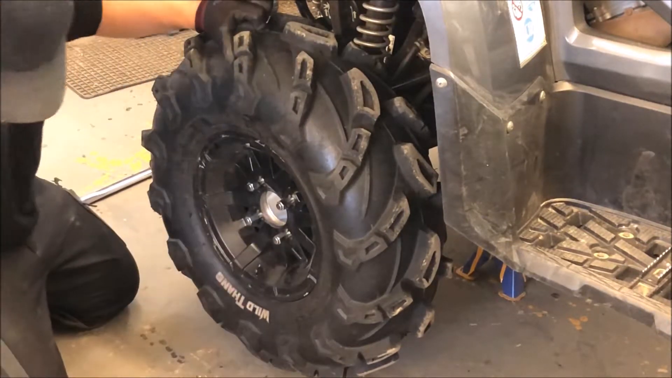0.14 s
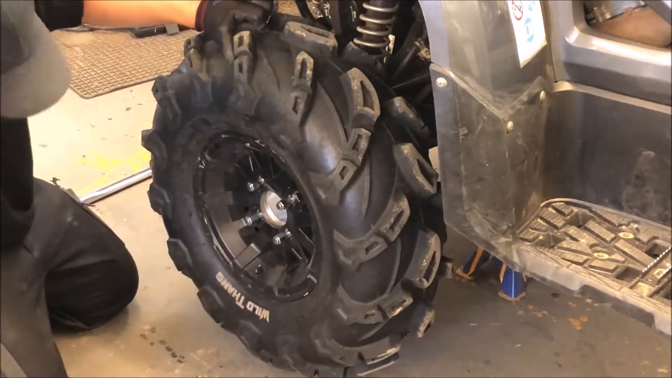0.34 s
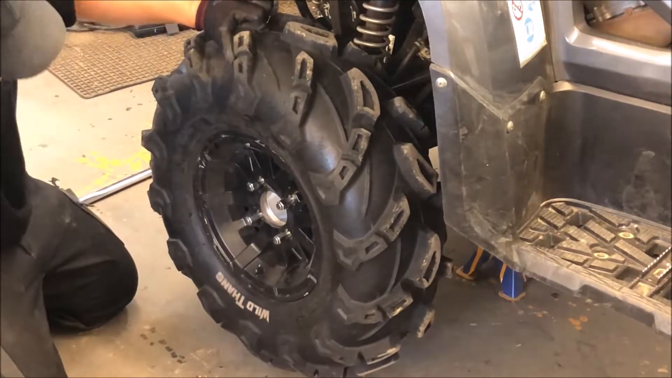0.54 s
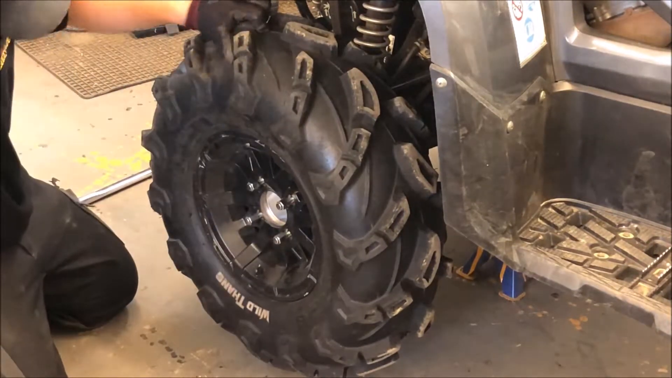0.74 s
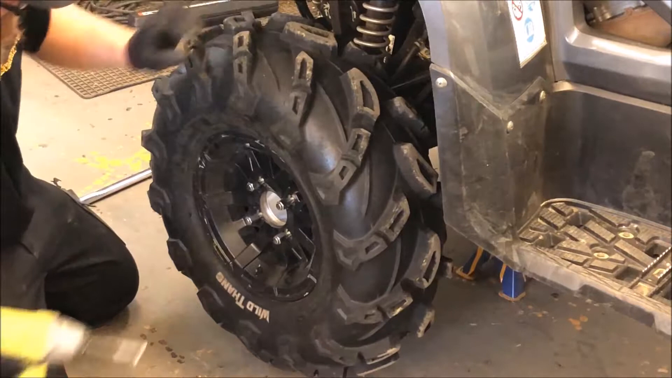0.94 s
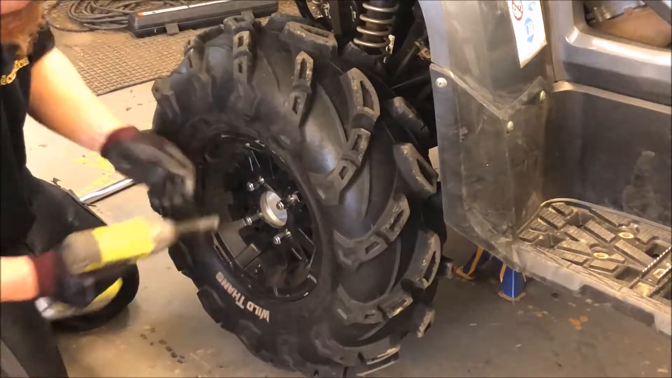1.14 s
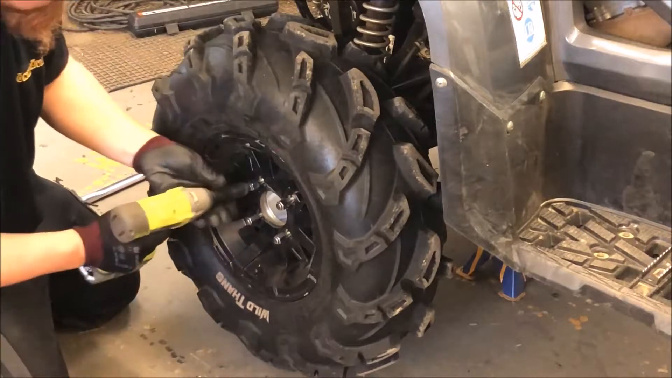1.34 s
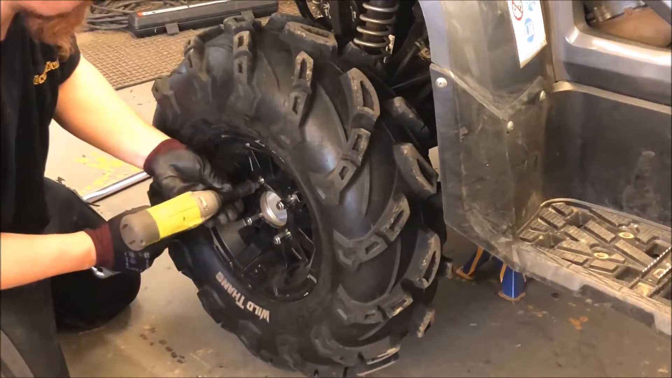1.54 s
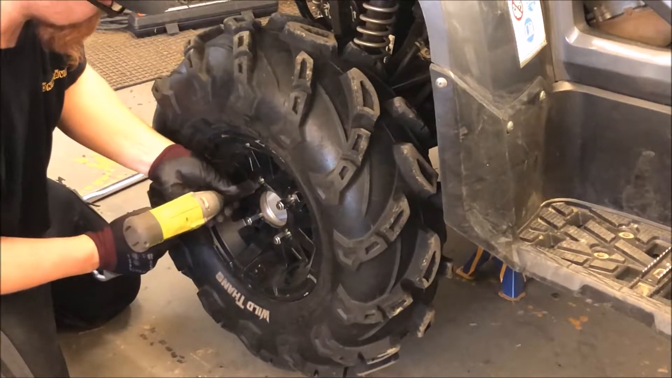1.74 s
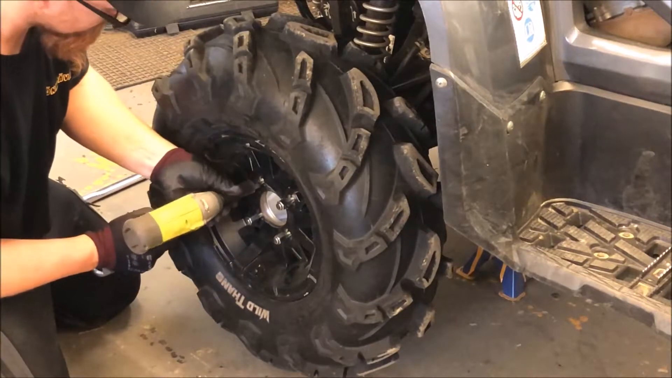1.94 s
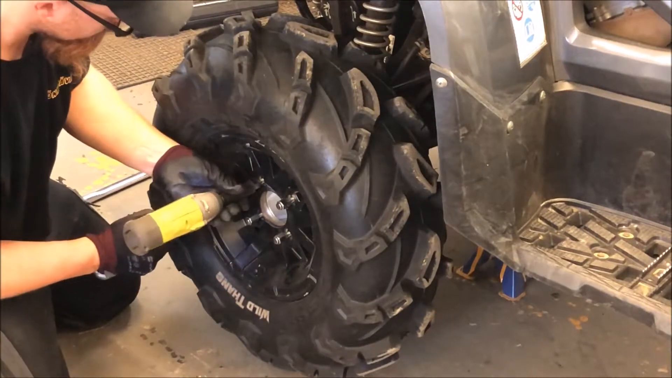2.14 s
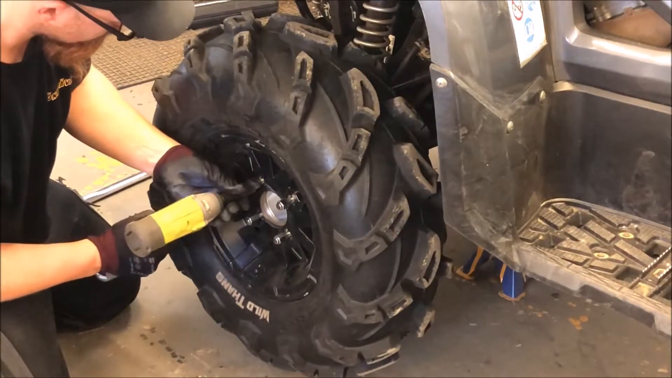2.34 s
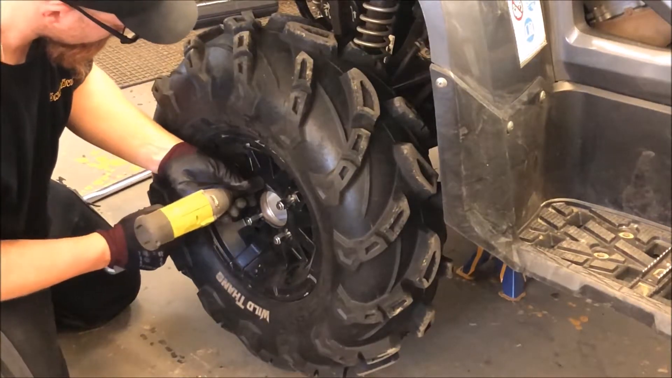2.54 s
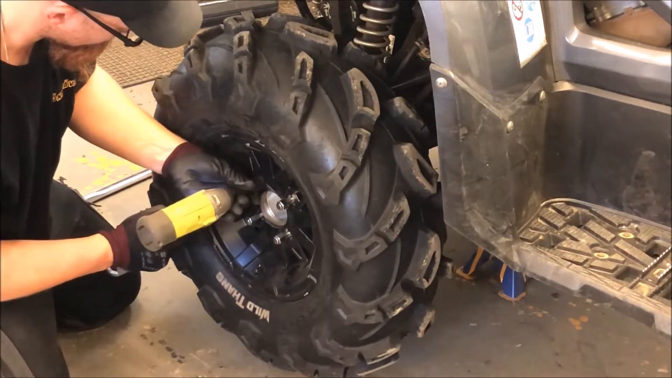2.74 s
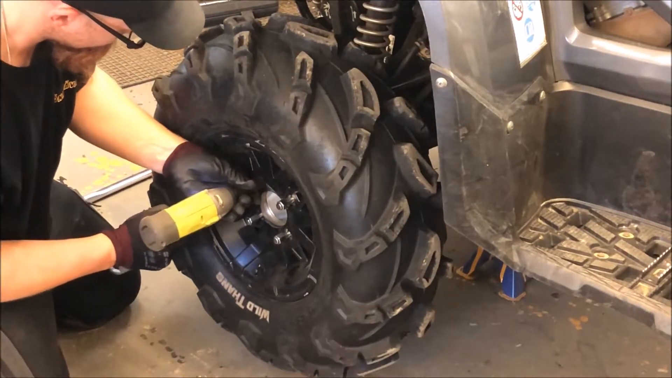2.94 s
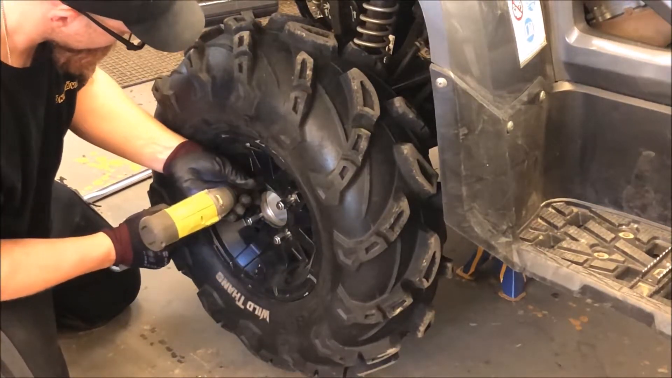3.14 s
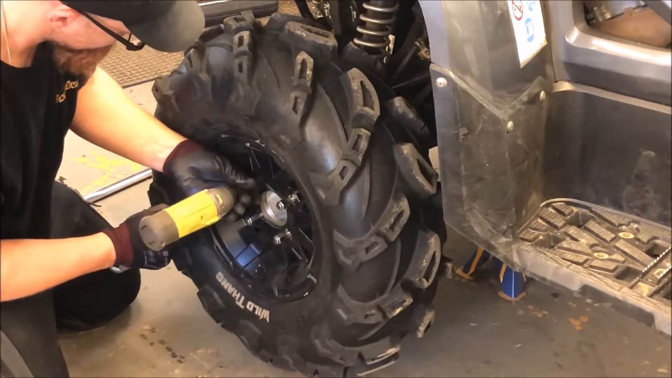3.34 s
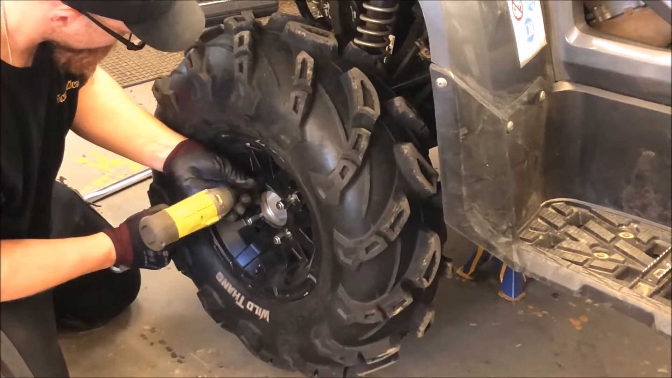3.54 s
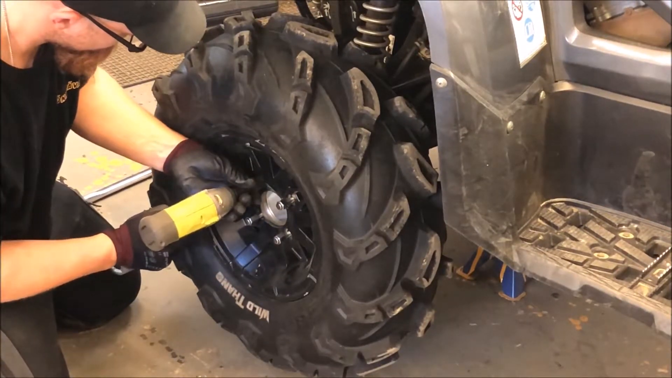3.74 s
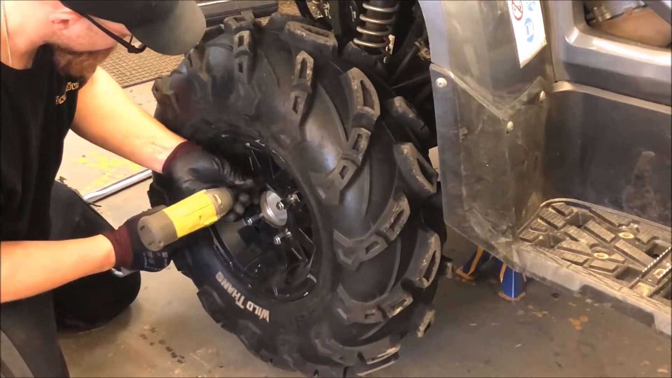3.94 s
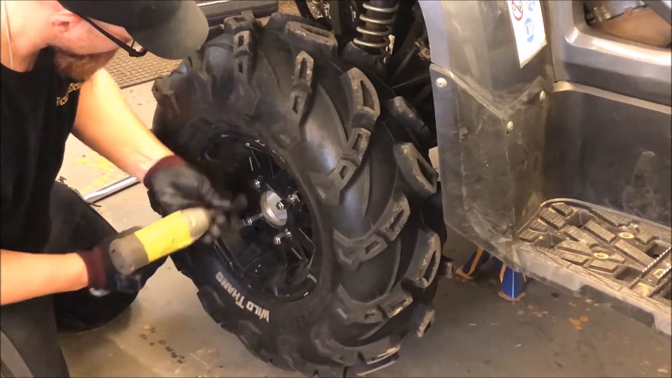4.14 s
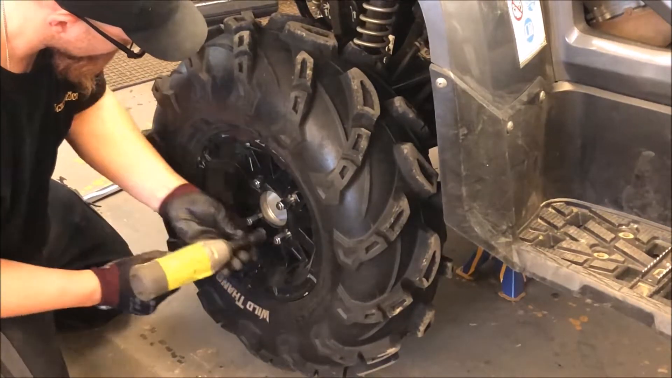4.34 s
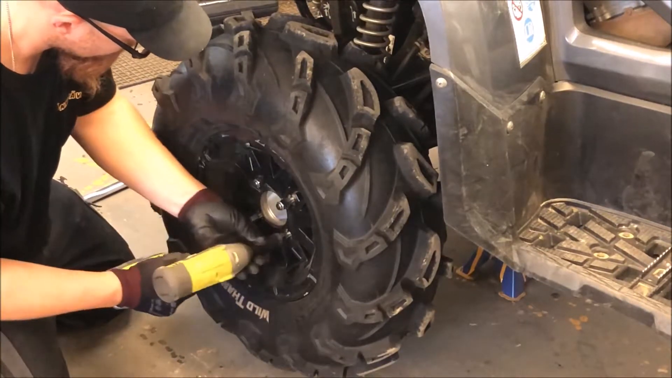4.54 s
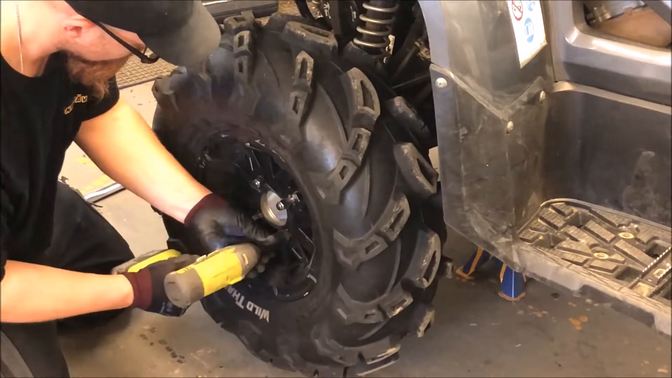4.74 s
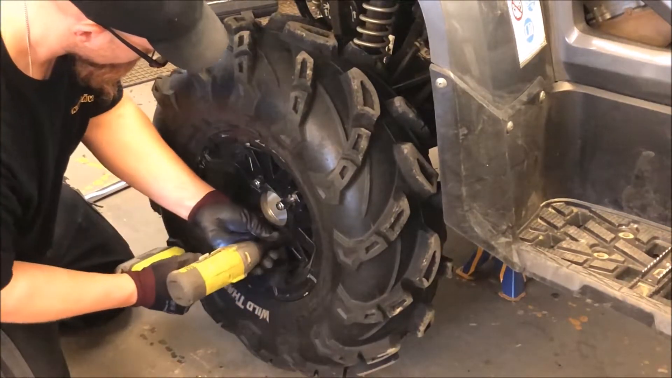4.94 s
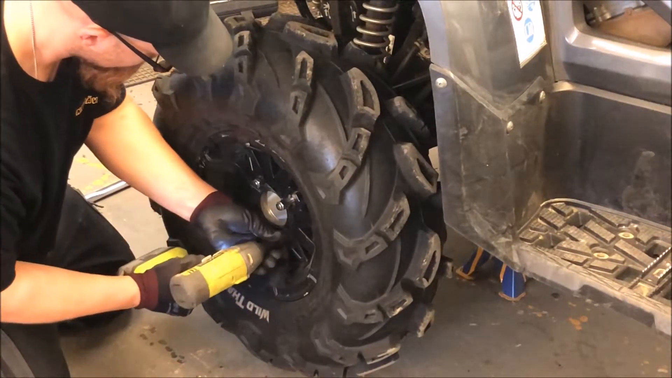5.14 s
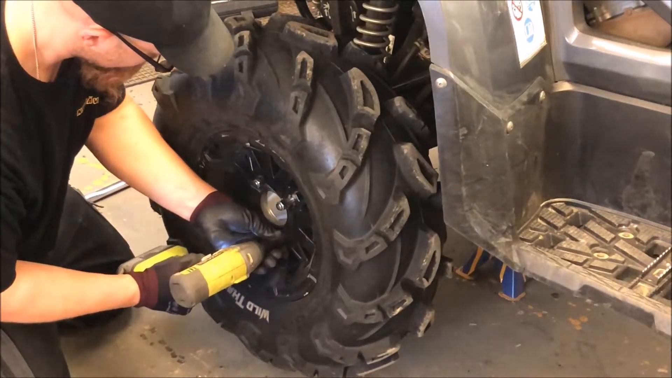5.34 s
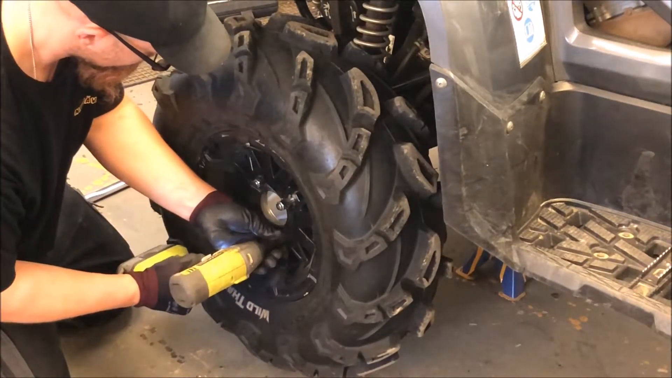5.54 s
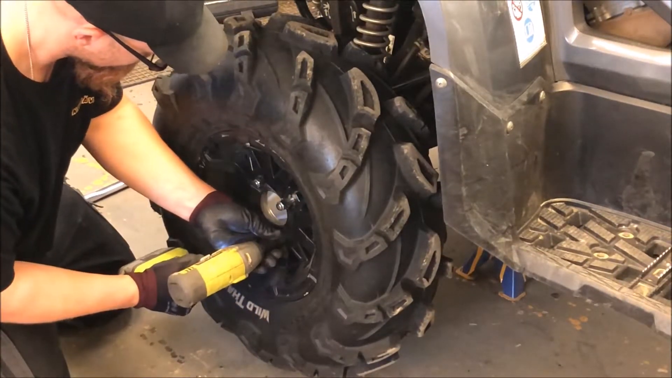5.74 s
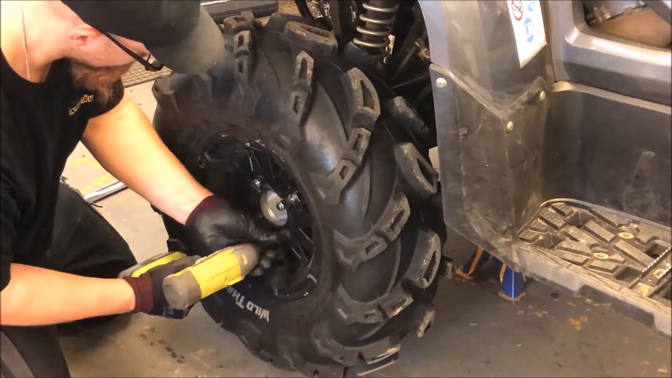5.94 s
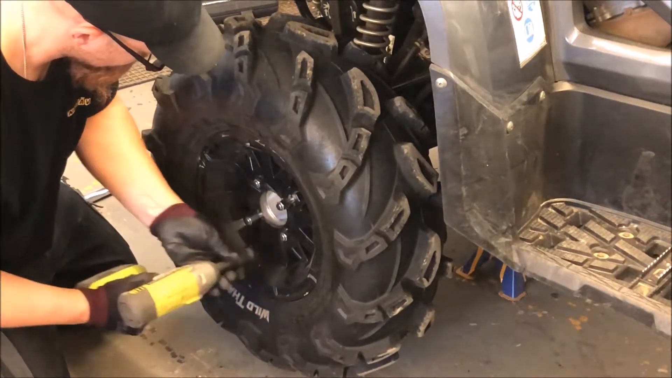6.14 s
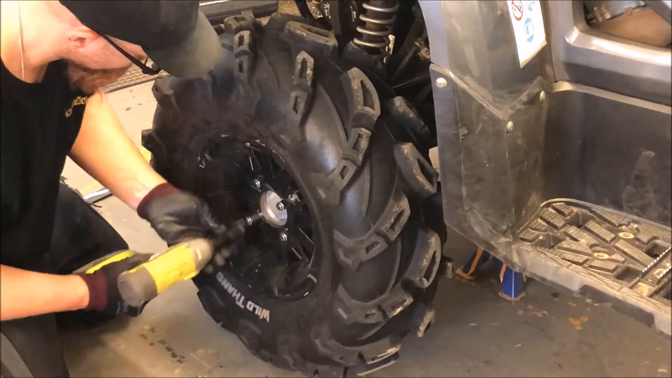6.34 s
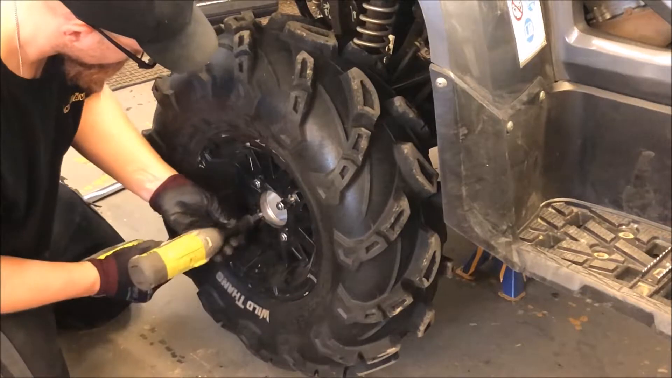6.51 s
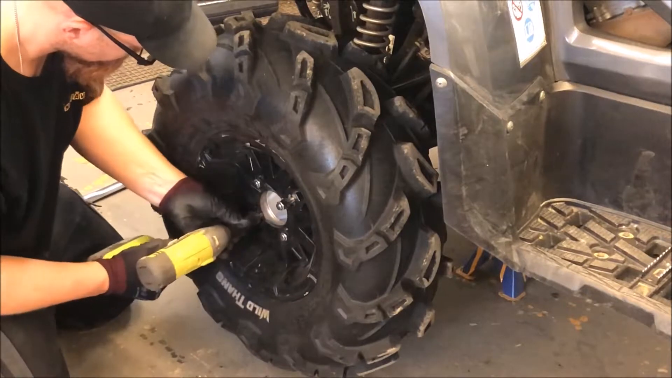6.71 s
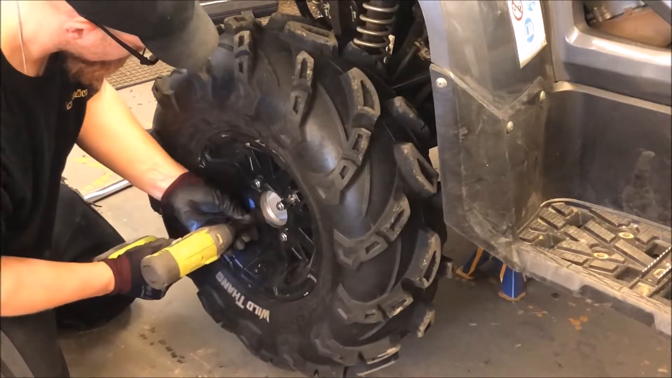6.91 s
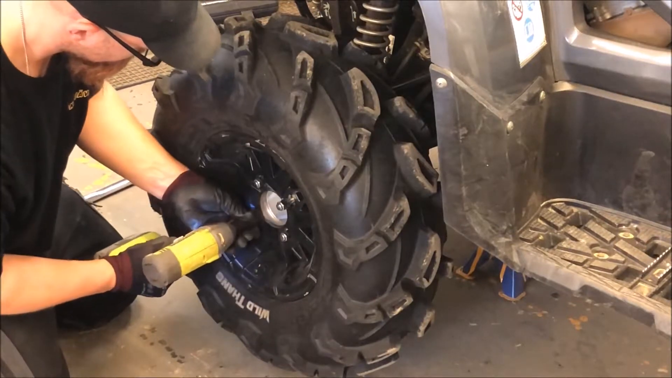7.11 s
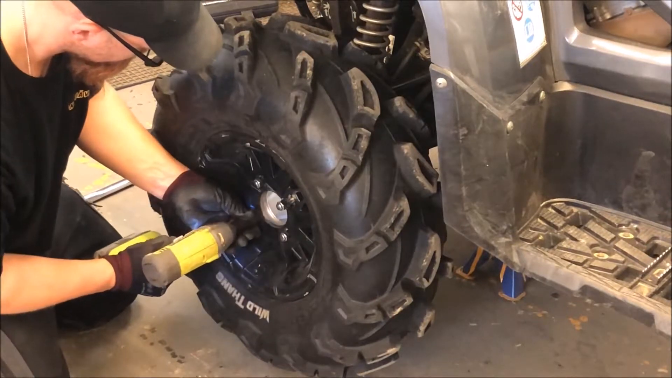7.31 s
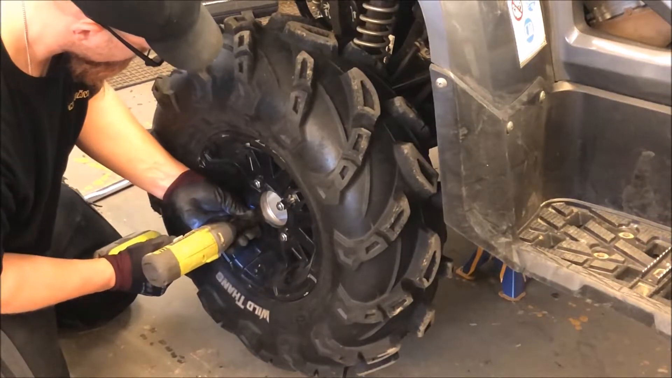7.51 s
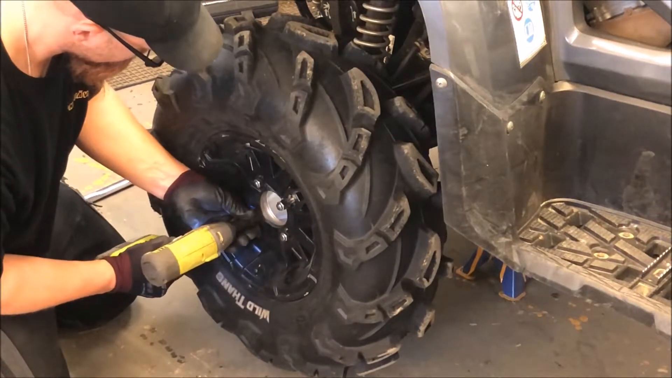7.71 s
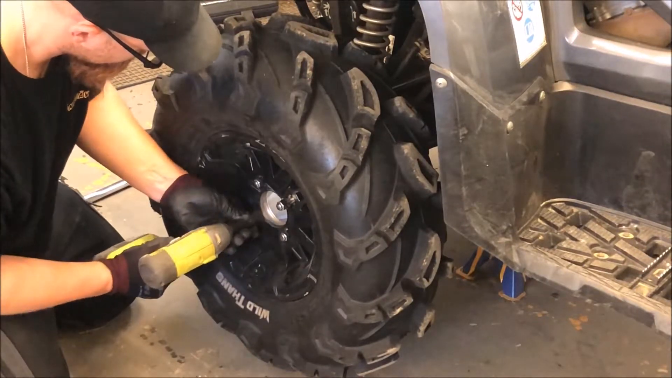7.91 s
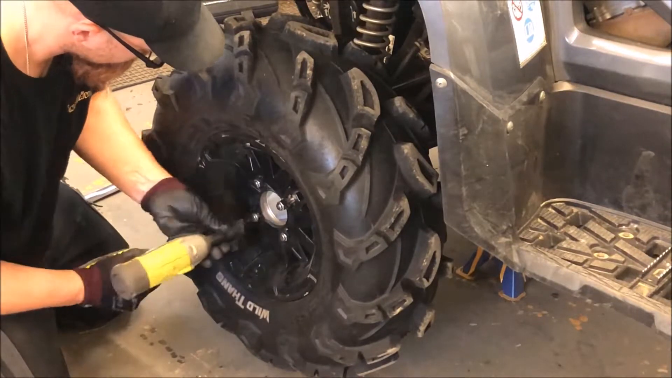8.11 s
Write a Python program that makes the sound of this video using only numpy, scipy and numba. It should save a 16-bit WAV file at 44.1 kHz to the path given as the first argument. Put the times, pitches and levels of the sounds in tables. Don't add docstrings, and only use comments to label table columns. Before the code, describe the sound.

Close phone pickup in a hard, bare garage. Gloves rub softly and loose metal ticks before a thin electric whine and growling motor rattle a socket on a nut. Fast, harsh hammer blows follow for a fraction of a second, then stop into a ringing echo. After brief shuffles and clacks, the motor runs and hammers again, then a third time. The loud blows pump and clip the sound.

```python
import sys
import numpy as np
from scipy import signal
from scipy.fft import rfft, irfft
from scipy.io import wavfile
from scipy.ndimage import uniform_filter1d
from numba import njit

SR = 44100
rng = np.random.default_rng(int(sys.argv[2]) if len(sys.argv) > 2 else 0)


def wav_out(sig):
    wavfile.write(sys.argv[1], SR, np.round(np.clip(np.atleast_2d(sig).T, -1, 1) * 32767).astype(np.int16))


def ratio_of_db(decibels):
    return 10 ** (np.asarray(decibels, float) / 20)


N = 360297
SPLIT_HZ = 5500

# (time [s], level [dB], treble [dB], bass [dB])
RUSTLE = [
    [(0.0, -55, -2, -10), (0.2, -81, -24, -6.5), (0.42, -78, 15, -10), (0.55, -66.5, -1, 8.5),
     (0.85, -70.5, 5, -1), (1.45, -79, 0, -1), (1.47, -79, 30, 30.5), (1.7, -61.5, -25, 0),
     (1.73, -64, 3, 11.5), (1.92, -80, -5, 8.5), (2.2, -72, 6, -10), (2.34, -65.5, 11, 16.5),
     (2.52, -58, -5, 1), (2.62, -54, -16, -15)],
    [(4.5, -71.5, -39, -25), (4.506, -44.5, 0.5, 4.5), (4.86, -47.5, -12, -9)],
    [(6.46, -72, -12, -6), (6.482, -46, 3, 8.5), (6.808, -56.5, -30, -5), (6.89, -50, 22, 10)],
]
# (frequency [Hz], level [dB])
RUSTLE_COLOUR = [(24, -44), (40, -19), (243, -4), (337, -5), (1120, -9.5), (1520, -15.5), (5580, -23.5),
                 (7360, -24), (16000, -47)]
# (time [s], peak [dB], bass [dB], treble [dB], sent to hall [dB], ring [Hz])
KNOCKS = [(0.3485, -54, -8, 0, 10, 1280), (0.3704, -47.5, -31, -2, 10.5, 4700),
          (0.5124, -51, -10, -16, 9, 1930), (0.554, -53.5, -7, 0, 11, 2620),
          (0.615, -37.5, -27, -7, 5, 1490), (1.0992, -42, -8.5, -4.5, 6, 2880),
          (1.4682, -37.5, -25, -16, 9.5, 3610), (1.721, -41, -25, 2, 2.5, 3460),
          (1.9644, -69, 0, -7, 2, 1250), (2.0394, -66, -1, -5, 4, 3540), (2.0778, -52, -12.5, -11, 6, 3150),
          (2.2858, -40, -19, -9, 6, 1390), (2.299, -38.5, -4.5, -4, 12, 4230),
          (2.3209, -22.5, -21, 4, 5, 3020), (2.613, -43, -16, -23, 11, 1230),
          (2.7758, -37.5, 0, 2, 8, 1340), (2.8644, -24, -15, -7, 3, 3200), (2.9577, -33.5, -8, -1, 9, 2930),
          (3.091, -37.5, -20, 5, 7, 3270), (3.1793, -37.5, -5.5, 6, -1, 3430),
          (3.2086, -41, -2, -16, 2, 2860), (3.379, -38, -2, 5, 5, 1760), (3.5544, -34, -17, 5, 4.5, 1720),
          (3.6104, -23.5, 0, -11, 7, 1930), (4.5128, -30, -25, -16, 3, 1450),
          (4.557, -29.5, -7, -2.5, 1, 1790), (4.6155, -32.5, -21, -30, 5, 1360),
          (4.6713, -37, -11, -27, -2, 1350), (4.7294, -58, -22, -15, 4, 1720),
          (4.7694, -51.5, -14, -19, 2, 1320), (4.8467, -18, -25, 3, 3.5, 2860),
          (4.8734, -29, -11, -8, 6, 2200), (4.9274, -25.5, -24, -12, 6, 1650),
          (4.983, -25.5, -13, 4, 7, 2200), (5.0025, -14, -24, -9, 2, 4440), (5.039, -29, -15, -31, 4, 1900),
          (5.1604, -28, -22, -8, 0, 4380), (5.1693, -18.5, -15, 4.5, 2.5, 2940),
          (5.233, -27.5, -22, 4, 5, 2480), (5.2842, -23, -18, -15, 3, 4470),
          (5.2904, -22, -22, -7, 6, 4400), (5.3126, -14.5, -18, -3, 2.5, 3040),
          (5.3442, -20, -25, 2.5, 8.5, 2280), (5.3775, -14.5, -21, -24, 5.5, 3000),
          (5.458, -22, -20, 1, 2, 3040), (5.4822, -15.5, -37, -2.5, 5.5, 2820),
          (5.583, -20, -8, 11.5, 5.5, 4540), (6.4713, -31, -11, 3.5, 6, 2550),
          (6.5057, -37.5, 4.5, -17, 5, 2710), (6.5804, -49, 1, -3, 10, 1240),
          (6.693, -37.5, -31, -15, 3.5, 2720), (6.7078, -43, -22, -17, 0, 1750),
          (6.8278, -40, -19, -12, 13, 2940), (6.8753, -18, -26, -0.5, 2.5, 2870),
          (6.8882, -31, -22, -10, 4, 2800), (6.931, -24, -24, -2, -1, 2890), (6.9541, -19, -28, 1, 2, 3140),
          (7.2178, -33, -12.5, 1.5, 4, 3600), (7.2597, -38, -6, 13, 8, 2380),
          (7.321, -35.5, -13.5, 12, 9, 4470), (7.41, -33, -14, 4, 10, 4600),
          (7.481, -36.5, -16, 8, 9, 2440), (7.5484, -31, -15, 4, 7, 1730)]
# (frequency [Hz], width [Hz], level [dB])
SOCKET_TONES = [(3535, 150, 0), (3830, 130, -1), (5800, 33, -16), (6360, 30, -19), (8600, 28, -13),
                (4500, 60, -11)]
# (time [s], ring [dB])
SOCKET_TAPS = [(.36, -79), (1.098, -66), (1.468, -47), (1.722, -61), (4.513, -64), (6.472, -41)]
# (frequency [Hz], level [dB])
WHINE = [(7472, -83), (14917, -91)]
# (start [s], end [s])
WHINE_SPAN = (1.8, 3.7)
# (time [s], gears [dB], treble [dB], hum [dB], hum [Hz])
MOTOR = [
    [(2.6, -55.5, -2.5, -67, 200), (2.78, -44, -1, -52, 231), (3.01, -47, -3.5, -46, 180),
     (3.522, -43, -3.5, -44.5, 244), (3.624, -45, 4, -45, 205), (3.63, -39, -7, -47, 210)],
    [(4.85, -38, -6, -57, 215), (4.878, -39.5, -5, -51, 223), (5.054, -41, -1, -46, 194),
     (5.308, -37, -5, -56, 230), (5.61, -39.5, -1, -40, 179)],
    [(6.88, -36.5, -11, -60, 206), (7.03, -40.5, -3.5, -50, 211), (7.542, -47.5, 1.5, -62, 211),
     (7.57, -28, -19, -58, 241)],
]
# (frequency [Hz], width [Hz], level [dB])
HOUSING_TONES = [(1360, 200, -6), (1780, 130, -5), (3270, 200, 0), (4700, 150, -7), (5420, 200, -7),
                 (7080, 250, -6), (8250, 200, -8), (10650, 350, -5), (14650, 400, -1)]
# (frequency [Hz], level [dB])
GEAR_COLOUR = [(18, -53.5), (30, -30), (127, -7), (170, 0.5), (554, -10), (740, -6), (1070, -12.5),
               (3220, -8), (6050, -14), (10500, -20), (12300, -26.5), (14800, -18.5), (16000, -35.5)]
# (time [s], ring [dB])
HOUSING_RING = [(2.9, -20), (3.05, -7), (3.63, -6), (4.85, -18), (6.9, -18), (7.5, -13)]
# (time [s], peak [dB], treble [dB], dip of the phone's volume [dB])
BLOWS = [(3.6332, -15.5, 3, -2), (3.6391, -6, -21.5, -2.5), (3.6593, -8, -3.5, -9), (3.69, -8, -15.5, -5),
         (3.7078, -8.5, -23, 3), (3.7401, -7, -4, -4.5), (3.747, -10, -9, -1), (3.7669, -14, 2, -1.5),
         (3.7782, -11.5, -18, -0.5), (3.7867, -12, -14, -0.5), (3.8053, -8.5, -15, 4),
         (3.8145, -18, -13.5, 1), (3.842, -5, -25.5, -1.5), (3.8541, -7, -3, -9), (3.8617, -5, -15, -3),
         (3.8806, -13.5, -26, 1), (3.8904, -8, 1, -0.5), (3.9006, -16.5, 1, -4.5), (3.918, -13.5, -2, 4),
         (3.931, -14, -20, -0.5), (3.9625, -10.5, 0, -1), (5.6104, -7.5, -23.5, 0.5),
         (5.619, -11.5, -27, 1), (5.6282, -6.5, -12, -9), (5.653, -10.5, -15, -1), (5.6621, -5, -9.5, -8.5),
         (5.6939, -13, -18, -5.5), (5.7149, -5.5, -14, -4.5), (5.7227, -7.5, -1, -8), (5.7534, -9, -3, -10),
         (5.7768, -20, -7, 4.5), (5.7825, -28, 1, -8), (5.8043, -8, -21, -1.5), (5.8131, -12, 2, -11),
         (5.8322, -7, -16, -4.5), (5.8647, -9, -17.5, -7.5), (5.8941, -7, -19, -4), (5.917, -18, 8.5, -1),
         (7.5685, -13.5, -11, 3.5), (7.5709, -14.5, 5.5, -2), (7.579, -16, -1, -4.5),
         (7.6067, -11.5, -28, -3), (7.612, -3.5, -19, -6.5), (7.6458, -10, -4, -5), (7.6758, -8.5, -2, -8),
         (7.7009, -6.5, -13, -1), (7.7054, -21, 5, -8.5), (7.735, -4, -6, -10), (7.7634, -6.5, 1, -9.5),
         (7.7918, -7.5, -19, -4.5), (7.8199, -7.5, -12, -4), (7.8695, -7, -7, -2.5), (7.8775, -18, 2.5, -3),
         (7.903, -10.5, -10, 0.5), (7.9242, -16, -19, 0)]
# (time [s], level [dB], treble [dB])
POUNDING = [
    [(3.64, -19, -4), (3.918, -36.5, 5.5), (3.98, -22.5, -6)],
    [(5.62, -20.5, -2), (5.842, -18.5, -3.5), (5.94, -29, 2)],
    [(7.575, -19.5, 1), (7.933, -21, -6), (7.94, -21, -8)],
]
# (frequency [Hz], width [Hz], level [dB])
STEEL_TONES = [(700, 69, -4), (1640, 630, 0), (2996, 83, 0), (4470, 300, -2), (6840, 290, -4),
               (11500, 84, -8), (11400, 77, -12)]
# (frequency [Hz], level [dB])
POUND_COLOUR = [(24, -56), (40, -77), (199, -4), (243, -8), (733, -4), (1070, -5.5), (1630, -2.5),
                (2440, -2.5), (3470, -2), (5310, -3.5), (7170, 1), (14800, -6), (16000, -13)]
ANVIL_HZ = [1250, 1640, 1900, 2276, 3140, 3533]
# (frequency [Hz], time to fall by 60 dB [s])
HALL = [(100, 0.92), (300, 0.99), (1000, 0.9), (2500, 0.71), (4500, 0.89), (7000, 0.5), (10000, 0.52),
        (14000, 0.24)]
# (frequency [Hz], level [dB])
ROOM_COLOUR = [(15, -41.5), (25, -18), (256, -9), (1020, -31), (1190, -25), (1440, -28), (1610, -19),
               (6740, -29), (14800, -40), (16000, -42)]
# (centre [s], length [frames], tones kept [count], preference for
THINNED = [(.95, 1, 6, .4), (1.165, 1, 9, .2), (1.27, 1, 7, .2), (1.355, 1, 7, .4), (1.70, 1, 7, .3),
           (2.358, 1, 9, .2), (3.045, 1, 24, .3), (3.47, 1, 20, .3), (3.62, 1.4, 10, .6), (3.723, 1, 6, .1),
           (4.312, 1.6, 8, .2), (4.387, 1, 12, .2), (5.602, 1.4, 4, .5), (6.625, 1, 20, .3),
           (7.841, 1, 3, 0), (7.949, 1, 2, 0)]


def unit(x):
    return x / np.sqrt(np.mean(x ** 2))


def band(x, lo_hz, hi_hz):
    return signal.sosfilt(signal.butter(2, [lo_hz, min(hi_hz, .45 * SR)], "band", fs=SR, output="sos"), x)


def split(x, at_hz):
    hz = np.fft.rfftfreq(len(x), 1 / SR)
    low = irfft(rfft(x) / (1 + (hz / at_hz) ** 4), len(x))
    return unit(low), unit(x - low)


def tilt(x, db, treble_db):
    low, high = split(x, SPLIT_HZ)
    return ratio_of_db(db) * (low + ratio_of_db(treble_db) * high)


def colour(x, points, peaks=(), peak_db=0.):
    hz = np.maximum(np.fft.rfftfreq(len(x), 1 / SR), 1)
    curve_hz, curve_db = np.transpose(points)
    gain = ratio_of_db(np.interp(np.log(hz), np.log(curve_hz), curve_db))
    lift = sum(1 / (1 + (2 * (hz - f) / w) ** 2) for f, w, _ in peaks)
    return unit(irfft(rfft(x) * gain * (1 + (ratio_of_db(peak_db) - 1) * lift), len(x)))


def play(tables, fade=.006):
    t, rows = np.arange(N) / SR, np.vstack(tables)
    gate = sum((t >= table[0][0]) & (t < table[-1][0]) for table in tables)
    curves = [np.interp(t, rows[:, 0], column) for column in rows.T[1:]]
    return uniform_filter1d(1. * gate, int(fade * SR) + 1), curves


def held(times, values):
    index = np.searchsorted(times, np.arange(N) / SR, "right") - 1
    return 1. * np.asarray(values)[np.maximum(index, 0)]


def grains(rate, scatter_db):
    ticks = rng.random(N) < rate / SR
    return ticks * rng.standard_normal(N) * ratio_of_db(scatter_db * rng.exponential(size=N))


def walk(rate):
    k = int(SR / rate)
    steps = np.repeat(rng.standard_normal(N // k + 1), k)
    return unit(uniform_filter1d(uniform_filter1d(steps, k), k)[:N])


def bursts(times, db, rise, t60, spike_db=6.):
    t = np.arange(int(.5 * SR)) / SR
    fall = np.exp(-np.log(1000) * t / t60)
    contact = ratio_of_db(spike_db) * np.exp(-t / 0.00058)
    shape = (1 - np.exp(-t / rise)) * (fall + contact)
    train = np.zeros(N)
    np.add.at(train, (np.asarray(times) * SR).astype(int), ratio_of_db(np.asarray(db)))
    return signal.fftconvolve(train, shape / shape.max())[:N]


@njit
def moving_band(x, hz, width):
    y, b, l = np.empty(len(x)), 0., 0.
    for i in range(len(x)):
        g, k = np.tan(np.pi * hz[i] / SR), width / hz[i]
        v = (b + g * (x[i] - l)) / (1 + g * (g + k))
        b, l, y[i] = 2 * v - b, l + 2 * g * v, k * v
    return y


def quiet_room():
    return ratio_of_db(-68.5) * colour(rng.standard_normal(N), ROOM_COLOUR)


def rustle():
    gate, (db, treble_db, bass_db) = play(RUSTLE, fade=0.0022)
    rubbing = rng.standard_normal(N) + 0.23 * unit(grains(170.0, scatter_db=6.5))
    shuffle, rest = split(colour(rubbing, RUSTLE_COLOUR), 1180.0)
    soft = tilt(rest, db - 6 + 3.6 * walk(30), treble_db)
    return gate * (soft + ratio_of_db(db + bass_db - 1.5 + 2.1 * walk(15)) * shuffle)


def knocks():
    s, db, bass_db, treble_db, room_db, ring_hz = np.transpose(KNOCKS)
    tone = [(100, -29), (250, 1), (1200, 7), (12000, -2.5), (16000, -5.5)]  # (Hz, dB)
    steel = colour(rng.standard_normal(N), tone)
    body, crack = split(steel, SPLIT_HZ)
    thud, middle = split(body, 1000.)
    middle = unit(1.09 * middle + unit(moving_band(steel, held(s, ring_hz), 390.0)))
    # (sound, level [dB], time to die away [s])
    parts = [(thud, db + bass_db + 1.5, .05), (middle, db - 0.5, .04), (crack, db + treble_db - 1.5, .03)]

    def struck(extra_db):
        return sum(x * bursts(s, part_db + extra_db, 0.00024, t60, spike_db=-4.0)
                   for x, part_db, t60 in parts)

    return struck(0), struck(room_db)


def socket():
    shake = rng.standard_normal(N)
    ring = unit(sum(ratio_of_db(db) * unit(band(shake, f - w / 2, f + w / 2)) for f, w, db in SOCKET_TONES))
    s, db = np.transpose(SOCKET_TAPS)
    return ring * bursts(s, db, 0.00067, 0.42, spike_db=-11.0)


def motor():
    gate, (gear_db, treble_db, hum_db, hum_hz) = play(MOTOR, fade=0.026)
    t = np.arange(N) / SR
    teeth = rng.standard_normal(N) + .5 * unit(grains(400., scatter_db=2.0))
    housing = unit(sum(ratio_of_db(db) * unit(band(teeth, f - w / 2, f + w / 2)) * ratio_of_db(3.6 * walk(17))
                       for f, w, db in HOUSING_TONES))
    ring_db = np.interp(t, *np.transpose(HOUSING_RING))
    mesh = unit(band(colour(teeth, GEAR_COLOUR), 270, 17000)) + ratio_of_db(ring_db) * housing
    gears = tilt(mesh, gear_db + 2 + 1.4 * walk(25), treble_db + 1.2 * walk(23))
    hum = unit(moving_band(moving_band(rng.standard_normal(N), hum_hz, 61.0), hum_hz, 120.0))
    rumble = unit(band(colour(rng.standard_normal(N), GEAR_COLOUR), 61, 600))
    running = gears + ratio_of_db(hum_db - 2.5) * (0.97 * hum + 1.46 * rumble)
    start, end = WHINE_SPAN
    whine_on = uniform_filter1d(1. * (t > start) * (t < end), 300) * ratio_of_db(3.1 * walk(42))
    whine = sum(ratio_of_db(db + 5) * np.sin(2 * np.pi * f * t) for f, db in WHINE)
    return gate * running + whine_on * whine


def hammer():
    s, db, treble_db, _ = np.transpose(BLOWS)
    leading_hz = held(s, rng.choice(ANVIL_HZ, len(s)))
    steel = colour(rng.standard_normal(N), POUND_COLOUR, STEEL_TONES, peak_db=2.5)
    body, treble = split(steel, SPLIT_HZ)
    body = unit(body + 0.44 * unit(moving_band(body, leading_hz, 400.)))
    blows = body * bursts(s, db - 3, 0.00052, 0.0353, spike_db=-5.5)
    blows += treble * bursts(s, db + treble_db - 3, 0.00042, 0.021, spike_db=-5.0)
    gate, (level_db, bright_db) = play(POUNDING)
    rattle = unit(grains(3000., scatter_db=1.4)) + 0.68 * rng.standard_normal(N)
    chatter = colour(rattle, POUND_COLOUR, STEEL_TONES, peak_db=2.5)
    chatter = chatter + 0.36 * unit(moving_band(chatter, leading_hz, 270.0))
    chatter = tilt(chatter, level_db - 1.5 + 1.3 * walk(150), bright_db)
    return band(blows + gate * chatter, 150.0, 20000)


def hall(x, hop=128):
    grid = dict(nperseg=4 * hop, noverlap=3 * hop)
    hz, _, sound = signal.stft(x, SR, **grid)
    noise = signal.stft(rng.standard_normal(N), SR, **grid)[2]
    hall_hz, hall_s = np.transpose(HALL)
    t60 = np.interp(np.log(hz + 1), np.log(hall_hz), hall_s)
    keep = np.exp(-2 * np.log(1000) * hop / SR / t60)
    power = uniform_filter1d(np.abs(sound) ** 2, size=3, axis=0)
    tail = np.array([signal.lfilter([0, 0, 0, 0, 1 - k], [1, -k], p) for k, p in zip(keep, power)])
    loudness = np.sqrt(np.maximum(tail, 0) / np.mean(np.abs(noise) ** 2))
    return signal.istft(loudness * noise, SR, **grid)[1][:N]


def scene():
    cloth = rustle()
    near, far = knocks()
    running, pounding = motor(), hammer()
    wet = hall(ratio_of_db(-6.5) * (far + running + cloth) + ratio_of_db(-0.5) * pounding)
    return (near + socket() + pounding + running + cloth + wet + quiet_room())[None]


def limiter(x, lag=0.0033, recover=.012):
    t, gain_db = np.arange(N) / SR, np.zeros(N)
    for s, _, _, dip_db in BLOWS:
        span = slice(int((s + lag) * SR), int((s + .09) * SR))
        since = t[span] - s - lag
        gain_db[span] += dip_db * np.exp(-(since / recover) ** 2)
    return x * ratio_of_db(uniform_filter1d(gain_db, 40))


def thin_out(x, left_db=-24, makeup_db=4.):
    x = x.copy()
    for centre, frames, count, bias in THINNED:
        n = int(frames * .038 * SR)
        start = int(centre * SR) - n // 2
        at = slice(start, start + n)
        window = np.sqrt(signal.windows.tukey(n, 1 / frames))
        bins = rfft(x[at] * window)
        loud = np.abs(bins) * np.arange(len(bins)) ** bias
        peaks = signal.find_peaks(loud, distance=18)[0]
        keep = np.full(len(bins), ratio_of_db(left_db))
        keep[:12] = 1
        for k in peaks[np.argsort(loud[peaks])[-count:]]:
            keep[k - 1:k + 2] = ratio_of_db(makeup_db)
        x[at] = x[at] * (1 - window ** 2) + irfft(bins * keep, n) * window
    return x


def roll_off(x):
    return signal.sosfilt(signal.butter(12, 16970, fs=SR, output="sos"), x)


def record(dry):
    x = signal.sosfilt(signal.butter(2, 60., "high", fs=SR, output="sos"), dry[0])
    x = np.tanh(1.18 * limiter(x)) / 2.055
    x = signal.sosfilt(signal.ellip(8, .3, 38, 15850, fs=SR, output="sos"), thin_out(x))
    return roll_off(x[None])


dry = scene()
out = record(dry)
wav_out(out)
```